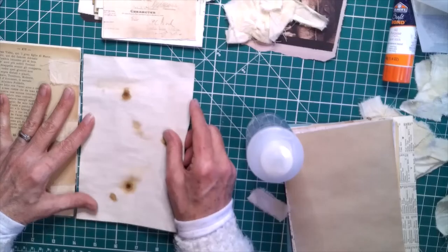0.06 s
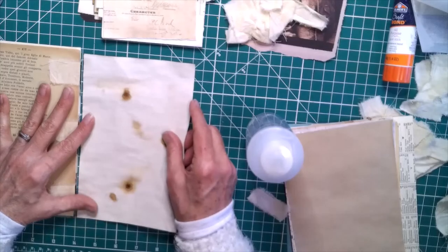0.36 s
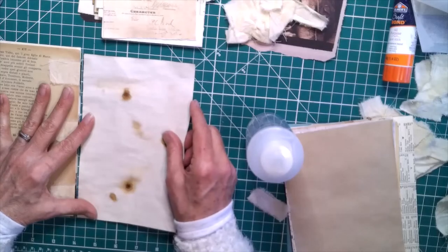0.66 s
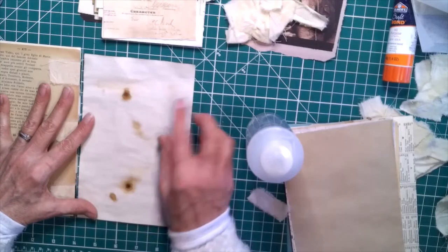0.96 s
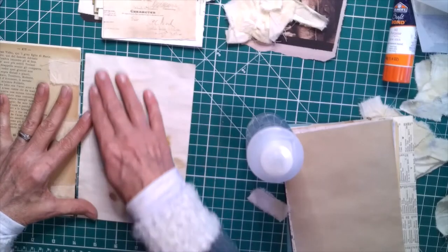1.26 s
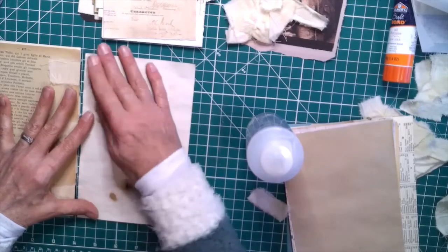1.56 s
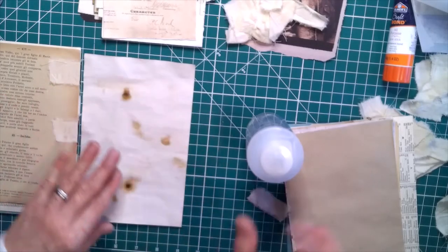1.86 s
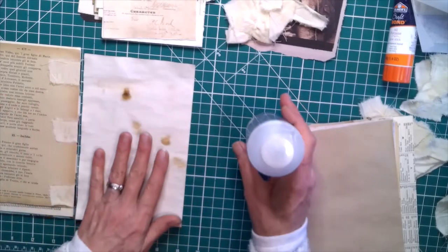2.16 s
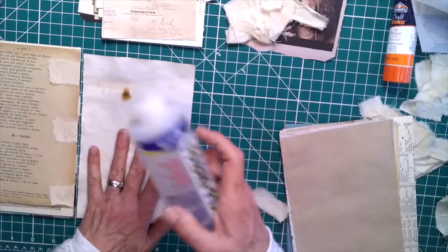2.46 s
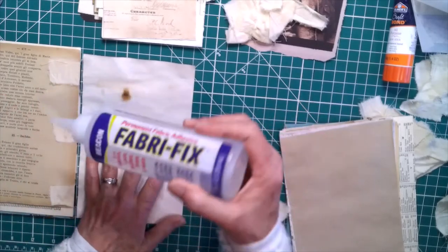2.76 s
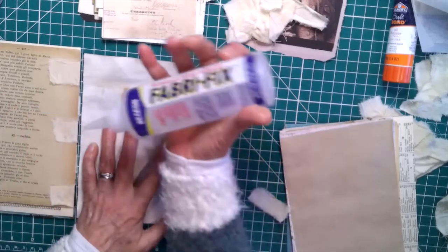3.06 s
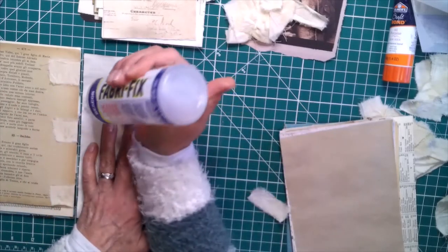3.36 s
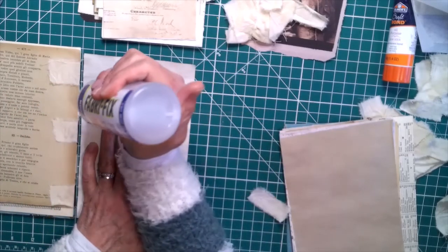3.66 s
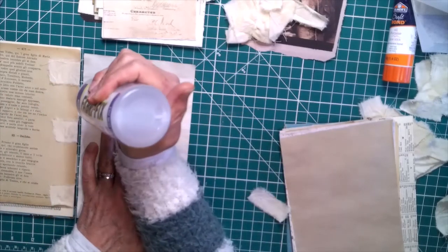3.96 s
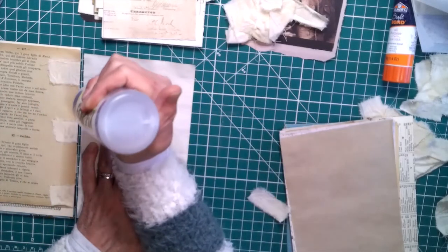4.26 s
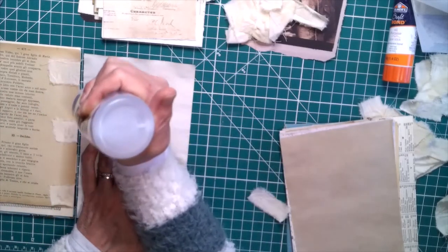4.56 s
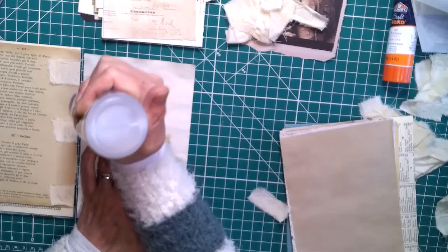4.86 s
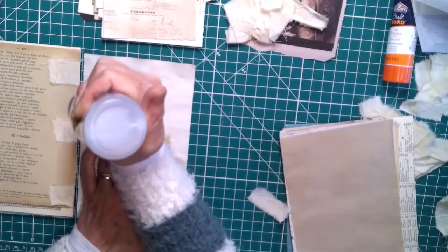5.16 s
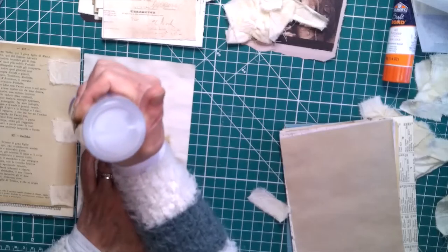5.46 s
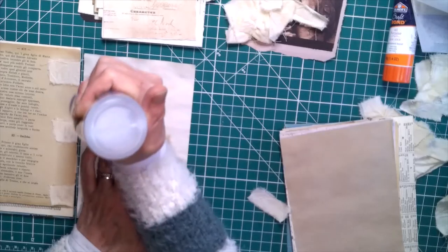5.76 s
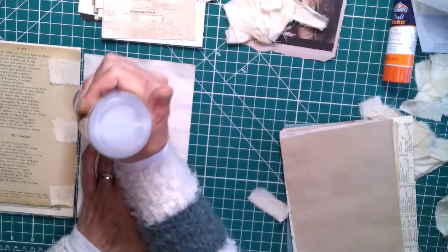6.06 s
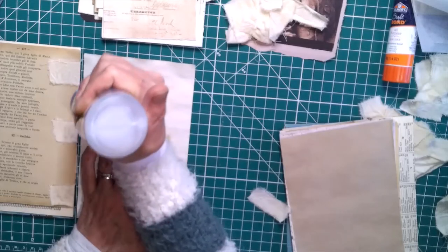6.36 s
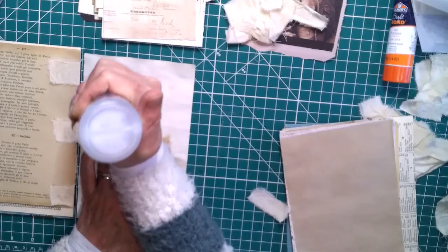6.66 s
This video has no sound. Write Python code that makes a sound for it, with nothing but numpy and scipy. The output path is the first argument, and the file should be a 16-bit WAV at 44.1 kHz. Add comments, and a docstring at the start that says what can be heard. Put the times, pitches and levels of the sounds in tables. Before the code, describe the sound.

The sounds are close, in a small quiet room with a faint steady hiss. A sheet of paper scuffs softly over a craft mat, then a quick push ends in a crisp snap at about 0.9 seconds. From 1.1 to 1.5 seconds a palm smooths the sheet in one bright, hissing sweep with a crackle and light pats, the loudest moment. Faint brushes of skin follow. At about 2.2 seconds a plastic glue bottle is picked up with a light knock. Just before 3 seconds a sleeve swishes briefly across the paper, ending in a soft pat. Near 3.9 seconds the gripped bottle gives a small pop. From 4.5 to about 6.8 seconds the nozzle scratches very faintly along the paper in short strokes, sometimes juddering with a tiny hollow hum, and taps down softly at 6.5 seconds.

```python
"""Paper and glue bottle on a craft mat

Close up in a small quiet room, a hand nudges a sheet of paper and smooths it with one sweep of the palm.
A plastic glue bottle is picked up with a knock, and a sleeve grazes the sheet. Then the nozzle is drawn
faintly along the paper, and the bottle judders now and then. Each rub is a hail of tiny fibre slips in
the colour of its surface; snaps, pats and knocks are short forces ringing damped resonances."""
import sys
import numpy as np
from scipy import signal
from scipy.fft import rfft, irfft, next_fast_len
from scipy.io import wavfile
from scipy.ndimage import uniform_filter1d, map_coordinates

SR = 44100
rng = np.random.default_rng(int(sys.argv[2]) if len(sys.argv) > 2 else 0)


def unload_wav(signal):
    """Save mono or channel-first audio to the path in sys.argv[1] as 16-bit WAV at rate SR, clipped to [-1, 1]."""
    wavfile.write(
        sys.argv[1],
        SR,
        np.round(np.clip(np.atleast_2d(signal).T, -1, 1) * 32767).astype(np.int16),
    )


N = 300054

# colour of the still room: freq_hz, gain_db
ROOM_TONE_COLOUR = [(12, -33.5), (20, -3.5), (133, -4), (252, -7), (282, -3.5), (342, -7.5), (372, -2.5),
                    (404, -7.5), (1040, -12.5), (1270, -13.5), (3960, -17), (12800, -19.5), (15500, -21.5)]
# the room's decay: freq_hz, t60_s
ROOM_DECAY = [(200, 0.34), (1500, 0.238), (5000, 0.21), (14000, 0.12)]

# the bottle is rubbed, twice by fingers, then by the paper under its nozzle: start_s, length_s, level_db
BOTTLE_RUBS = [(3.29, 0.075, -66), (3.375, 0.032, -64), (4.5, .14, -68), (4.655, 0.099, -61),
               (4.78, 0.14, -62.5), (4.92, 0.15, -65.5), (5.13, 0.09, -60.5), (5.23, .125, -64.5),
               (5.39, .14, -65.5), (5.55, 0.13, -66), (5.68, 0.16, -64.5), (5.86, .13, -64.5),
               (6.04, 0.12, -64.5), (6.16, .11, -67), (6.325, .11, -62.5), (6.48, 0.12, -62.5),
               (6.6, 0.16, -62.5)]
# colour of the nozzle's scratch: freq_hz, gain_db
NOZZLE_COLOUR = [(290, -23), (500, -29.5), (646, 2.5), (949, -11), (1060, -2.5), (1320, -4.5), (1850, 0),
                 (2050, -7.5), (3140, -1), (3670, -5), (4940, -2.5), (9650, -6.5), (12000, -14),
                 (15000, -20)]
# the nozzle sticks and slips, and the bottle hums: start_s, length_s, level_db
NOZZLE_JUDDERS = [(4.53, .05, -69), (4.818, .072, -56.5), (5.01, .05, -70), (5.37, .05, -71),
                  (6.358, .04, -62.5), (6.402, .036, -60.5), (6.62, .04, -65), (6.665, .035, -56.5)]
# the hollow of the bottle standing on its nozzle: pitch_hz, width_hz, gain_db
HOLLOW_MODES = [(383, 58, 0.5), (646, 30, 1.5), (1850, 160, -2)]
# the nozzle is set down hard enough to ring the hollow: start_s, level_db
NOZZLE_SET_DOWN = (6.496, -48)
# base or nozzle knocks on the table: start_s, level_db
BOTTLE_KNOCKS = [(2.210, -55), (2.2353, -49.5), (2.247, -42), (2.2496, -31.5), (2.261, -44), (6.339, -55.5),
                 (6.495, -50), (6.501, -52)]
# resonances of the knocked bottle: pitch_hz, width_hz, gain_db
BOTTLE_MODES = [(430, 130, -5), (664, 140, -1), (1036, 200, 0), (1460, 200, 1), (1800, 290, 0),
                (2900, 440, -6.5), (4180, 600, -4), (5500, 1100, -5), (7020, 560, -3), (9800, 1600, -13)]
# the plastic wall pops under the grip: start_s, level_db
WALL_POP = (3.9123, -43.5)
# resonances of that thin wall: pitch_hz, width_hz, gain_db
WALL_MODES = [(250, 42, -1.5), (2240, 310, -2), (3260, 1040, -12.5), (9000, 6000, -24), (13600, 1800, -19)]

# skin brushes over paper and bottle: start_s, length_s, level_db
SKIN_BRUSHES = [(1.52, 0.067, -59.5), (1.59, 0.12, -59.5), (1.745, .08, -61.5), (2.32, 0.067, -59.5),
                (2.405, .145, -63), (2.56, .26, -61.5), (2.615, .065, -56.5), (2.68, .05, -62)]
# colour of brushing skin: freq_hz, gain_db
SKIN_COLOUR = [(290, -19), (500, -7), (611, -7.5), (851, -12), (1220, -6), (1450, -11), (1700, -10),
               (7670, -3.5), (15500, -11)]
# the sleeve grazes the sheet, gathering speed: start_s, stop_s, peak_db
SLEEVE_GRAZE = (2.893, 2.973, -37.5)
# colour of the sleeve on the sheet: freq_hz, gain_db
SLEEVE_COLOUR = [(1180, -40), (2000, -20), (3300, -28), (4050, -5), (4790, -4), (5270, -7.5), (5790, 2),
                 (6250, -8), (6690, -2), (8510, -12), (10900, -11.5), (15500, -28)]
# the grip tightens on the bottle: start_s, length_s, level_db
GRIP_SQUEEZE = (3.67, 0.23, -65)
# colour of fingertips creeping on plastic: freq_hz, gain_db
GRIP_COLOUR = [(1500, -26), (4000, -3), (6000, -2), (10000, -1), (12000, -9), (14300, 4), (15500, -9)]

# fingers nudge the sheet over the mat: start_s, length_s, level_db
SHEET_NUDGES = [(.035, .1, -64.5), (.185, 0.091, -63.5), (.29, .1, -58.5), (.485, .055, -60),
                (.515, .125, -63.5), (.645, 0.062, -64.5), (.72, .08, -68)]
# a last push gathers speed until the sheet buckles: start_s, stop_s, peak_db
SHEET_PUSH = (.808, .911, -29.5)
# colour of the sheet sliding on the mat: freq_hz, gain_db
SLIDE_COLOUR = [(350, -34), (600, -20), (832, -18), (902, -21), (1560, -13.5), (2040, -19.5), (3710, -4),
                (4200, -1), (6490, -4.5), (7140, -6.5), (9370, -7), (13700, -16), (15500, -20.5)]
# the sheet is patted flat: start_s, level_db, pitch_hz
SHEET_PATS = [(0.645, -51.5, 1370), (0.9144, -39, 1480), (0.918, -39, 1120), (1.2285, -34, 1320),
              (1.243, -31.5, 1290), (1.312, -39, 1510), (2.225, -56, 1350), (2.9788, -36.5, 1560),
              (2.991, -47, 1690), (3.673, -54, 820)]
# resonances of the patted sheet: pitch_ratio, relative_width, gain_db
SHEET_MODES = [(.58, 0.6, -4.5), (1, 0.25, 7), (1.35, 0.41, -0.5), (1.9, .2, 1.5), (3, .25, -7)]
# small snaps of the paper: start_s, level_db, pitch_hz, t60_s
PAPER_SNAPS = [(0.152, -54, 6500, .012), (0.6435, -42.5, 3700, 0.011), (0.9091, -30, 6540, 0.017),
               (0.9098, -27.5, 3860, 0.026), (0.911, -25, 6550, 0.012), (1.143, -48, 5960, .015),
               (1.1482, -43.5, 5670, 0.015), (1.2275, -23, 4760, .018), (1.6747, -56, 2350, 0.013),
               (1.7903, -50, 6300, 0.044), (1.7977, -45.5, 6500, 0.012), (3.8295, -59, 5960, 0.0058),
               (6.495, -55, 5840, 0.014)]

# one sweep of the palm: time_s, hiss_db, fizz_db
PALM_SWEEP = [(1.141, -52, -61), (1.161, -43, -43), (1.185, -34, -40), (1.215, -35, -32), (1.231, -25, -31),
              (1.253, -25, -30.5), (1.291, -34, -31), (1.341, -37, -41), (1.379, -43, -41),
              (1.447, -56, -63), (1.47, -66, -73)]
# colour of the palm on paper: freq_hz, gain_db
PALM_COLOUR = [(120, -34), (250, -25), (378, -18), (544, -25), (658, -14.5), (995, -19.5), (1250, -17),
               (1990, -15.5), (2320, -15), (2800, -17), (4790, -3.5), (7130, 0), (8040, 1), (14200, -4.5),
               (15500, -10)]
# late in the sweep the heel of the hand drags: start_s, length_s, level_db
HEEL_DRAG = (1.345, .065, -54)

ROOM_TONE_DB, MAINS_DB, TOP_HZ = -65.2, -89, 15700
SPEED_POWER = .8  # loudness follows the hand's speed to this power
CATCH_DB = 1.5  # how unevenly the nozzle catches on the paper
BODY_DB, PRESS_DB_PER_S = -22, 44  # the sheet's body against the hiss, growing as the palm presses


def amp(db):
    """Decibels to gain."""
    return 10 ** (np.asarray(db) / 20)


def unit(x):
    """Scale to rms 1."""
    return x / np.sqrt(np.mean(x ** 2) + 1e-20)


def unit_hit(sound):
    """Scale a hit so that its loudest two milliseconds have rms 1."""
    return sound / np.sqrt(np.max(uniform_filter1d(sound ** 2, size=88)))


def along(points, hz):
    """Read (freq_hz, value) points on a log frequency axis."""
    freqs, values = np.transpose(points)
    return np.interp(np.log(hz + 1), np.log(freqs + 1), values)


def add(track, start_s, sound):
    """Mix a sound into the track at start_s."""
    part = track[round(start_s * SR):][:len(sound)]
    part += sound[:len(part)]


def wobble(rate):
    """A smooth random curve, rate knots a second."""
    knots = rng.standard_normal(int(N * rate / SR) + 4)
    return map_coordinates(knots, [np.arange(N) * rate / SR])


def filtered(x, response):
    """Shape x with a complex frequency response."""
    size = next_fast_len(len(x) + 8192)
    hz = np.fft.rfftfreq(size, 1 / SR)
    return irfft(rfft(x, size) * response(hz), size)[:len(x)]


def coloured(x, colour):
    """Give x a colour, at rms 1."""
    return unit(filtered(x, lambda hz: amp(along(colour, hz))))


def resonate(x, modes):
    """Play x through a bank of damped resonances of alternating polarity."""
    def response(hz):
        return sum((-1) ** k * amp(db) * 1j * hz * width / (pitch ** 2 - hz ** 2 + 1j * hz * width)
                   for k, (pitch, width, db) in enumerate(modes))
    return filtered(x, response)


def table_bounce(x, delay_s, share):
    """A reflection off the table top combs the sound of a surface just above it."""
    return unit(filtered(x, lambda hz: 1 + share * np.exp(-2j * np.pi * hz * delay_s)))


def faders(rows):
    """One gain curve for each dB column, fading quickly outside the rows."""
    times, *levels = np.transpose(rows)
    t = np.arange(N) / SR
    outside_s = np.abs(t - np.clip(t, times[0], times[-1]))
    return [amp(np.interp(t, times, db)) * np.exp(-outside_s / 0.0043) for db in levels]


def strokes(rows, power):
    """Gain of rubbing strokes: in each the hand speeds up and slows down in half a sine."""
    t = np.arange(N) / SR
    gain = np.zeros(N)
    for start_s, length_s, db in rows:
        speed = np.abs(np.sin(np.pi * np.clip((t - start_s) / length_s, 0, 1)))
        gain += amp(db) * speed ** power
    return gain


def swell(move, surge_s, release_db_per_s):
    """Gain of a slide that creeps, surges in its last surge_s, and is stopped short."""
    start_s, stop_s, peak_db = move
    t = np.arange(N) / SR
    fade_in = np.clip((t - start_s) / .025, 0, 1)
    surge = 1 / (1 + np.maximum(stop_s - t, 0) / surge_s) ** 2
    return fade_in * surge * amp(peak_db - release_db_per_s * np.maximum(t - stop_s, 0))


def rub(colour, spread_db, flutter_db=1.5):
    """Friction at rms 1: a dense hail of uneven fibre slips, in clumps as the contact catches."""
    slip_db = spread_db * wobble(3000) + flutter_db * wobble(160)
    return coloured(rng.standard_normal(N) * amp(slip_db), colour)


def contact(t60_s):
    """The force of a hit: a first kick, then chatter that dies within t60_s."""
    t = np.arange(SR // 8) / SR
    force = rng.choice([-1, 1], len(t)) * amp(-60 * t / t60_s)
    force[0] = amp(10.5)
    return force


def room_tone():
    """Room rumble, microphone hiss and a trace of mains hum."""
    air = coloured(rng.standard_normal(N), ROOM_TONE_COLOUR)
    mains = np.sqrt(2) * np.sin(2 * np.pi * 60 * np.arange(N) / SR)
    return amp(ROOM_TONE_DB) * air + amp(MAINS_DB) * mains


def small_room(x):
    """A few near surfaces answer at once, then a short diffuse tail follows."""
    hz, t, noise = signal.stft(rng.standard_normal(SR // 3), SR, nperseg=256)
    decay = amp(-60 * t / along(ROOM_DECAY, hz)[:, None])
    build_up = 1 - np.exp(-t / 0.0011)
    tail = signal.istft(noise * decay * build_up, SR, nperseg=256)[1]
    echo = amp(-12) * tail / np.linalg.norm(tail)
    for delay_s in rng.uniform(.001, .012, size=6):
        echo[round(delay_s * SR)] += amp(-22.5)
    return x + signal.fftconvolve(x, echo)[:N]


def nozzle():
    """The tip scratches along the paper and drives the bottle's hollow, most of all when it judders."""
    scratch = rub(NOZZLE_COLOUR, spread_db=3.0)
    hollow = unit(resonate(rng.standard_normal(N), HOLLOW_MODES))
    # stick-slip locks to the lowest resonance, so its strength is steady while its pitch wanders
    hum_hz = HOLLOW_MODES[0][0] * (1 + 0.04 * wobble(90))
    hum = np.sqrt(2) * np.sin(2 * np.pi * np.cumsum(hum_hz) / SR)
    drag = strokes(BOTTLE_RUBS, power=.55) * amp(CATCH_DB * wobble(30))
    judder = strokes(NOZZLE_JUDDERS, power=.4)
    return drag * (amp(-1.2) * scratch + amp(-6) * hollow) + judder * hum


def bottle():
    """The bottle knocks and rattles, its squeezed wall pops, and its hollow rings as it is set down."""
    out = np.zeros(N)
    for start_s, db in BOTTLE_KNOCKS:
        force = contact(t60_s=0.024) + amp(-14.5) * contact(t60_s=0.2)
        add(out, start_s, amp(db) * unit_hit(resonate(force, BOTTLE_MODES)))
    click = signal.unit_impulse(SR // 8)
    for (start_s, db), modes in [(WALL_POP, WALL_MODES), (NOZZLE_SET_DOWN, HOLLOW_MODES)]:
        add(out, start_s, amp(db) * unit_hit(resonate(click, modes)))
    return out


def hands():
    """Skin brushes paper and bottle, the sleeve grazes the sheet, and gripping fingertips creep."""
    skin = strokes(SKIN_BRUSHES, SPEED_POWER) * rub(SKIN_COLOUR, spread_db=2.0)
    cloth = table_bounce(rub(SLEEVE_COLOUR, spread_db=2.5), delay_s=0.00104, share=0.38)
    sleeve = swell(SLEEVE_GRAZE, surge_s=.026, release_db_per_s=550) * cloth
    grip = strokes([GRIP_SQUEEZE], power=0.2) * rub(GRIP_COLOUR, spread_db=3.0)
    return skin + sleeve + grip


def sheet_slides():
    """The sheet scuffs over the mat in a few nudges and one quickening push."""
    nudges = strokes(SHEET_NUDGES, SPEED_POWER)
    push = swell(SHEET_PUSH, surge_s=.028, release_db_per_s=1000)
    return (nudges + push) * rub(SLIDE_COLOUR, spread_db=1.5)


def sheet_pats():
    """The sheet slaps the mat and flutters briefly; a smaller patch sounds higher."""
    out = np.zeros(N)
    for start_s, db, hz in SHEET_PATS:
        force = contact(t60_s=0.012) + amp(-15) * contact(t60_s=.07)
        modes = [(hz * ratio, hz * ratio * width, gain_db) for ratio, width, gain_db in SHEET_MODES]
        add(out, start_s, amp(db) * unit_hit(resonate(force, modes)))
    return out


def paper_snaps():
    """A buckle in the paper lets go: one quickly damped resonance and a dry, bright crack."""
    out = np.zeros(N)
    for start_s, db, hz, t60_s in PAPER_SNAPS:
        ring = unit_hit(resonate(contact(t60_s), [(hz, hz * 0.085, 0)]))
        crack = unit_hit(resonate(contact(t60_s), [(7000, 9000, 0)]))
        add(out, start_s, amp(db) * (ring + amp(-3.5) * crack))
    return out


def palm_sweep():
    """The palm hisses over the sheet; pressure brings out the sheet's body, speed the finest fizz."""
    def below(hz, edge_hz):
        return 1 / (1 + (hz / edge_hz) ** 12)

    hiss, fizz = faders(PALM_SWEEP)
    land_s, lift_s = PALM_SWEEP[0][0], PALM_SWEEP[-1][0]
    pressed_s = np.clip(np.arange(N) / SR, land_s, lift_s) - land_s
    body = hiss * amp(BODY_DB + PRESS_DB_PER_S * pressed_s) + strokes([HEEL_DRAG], SPEED_POWER)
    friction = rub(PALM_COLOUR, spread_db=0.8, flutter_db=1.0)
    combed = table_bounce(friction, delay_s=0.0016, share=0.121)
    lows = unit(filtered(combed, lambda hz: below(hz, 3960)))
    mids = unit(filtered(combed, lambda hz: below(hz, 9640) - below(hz, 3100)))
    highs = unit(filtered(combed, lambda hz: 1 - below(hz, 9450)))
    return body * lows + amp(-1) * hiss * mids + amp(-1.2) * fizz * highs


def scene():
    """All the handling in the small room, over a bed of room tone, in mono."""
    handling = sheet_slides() + palm_sweep() + hands() + paper_snaps() + sheet_pats()
    handling += bottle() + nozzle()
    return (small_room(handling) + room_tone())[None]


def record(dry):
    """A brick-wall low-pass cuts everything above TOP_HZ."""
    return np.array([filtered(channel, lambda hz: hz < TOP_HZ) for channel in dry])


dry = scene()
out = record(dry)
unload_wav(out)
```